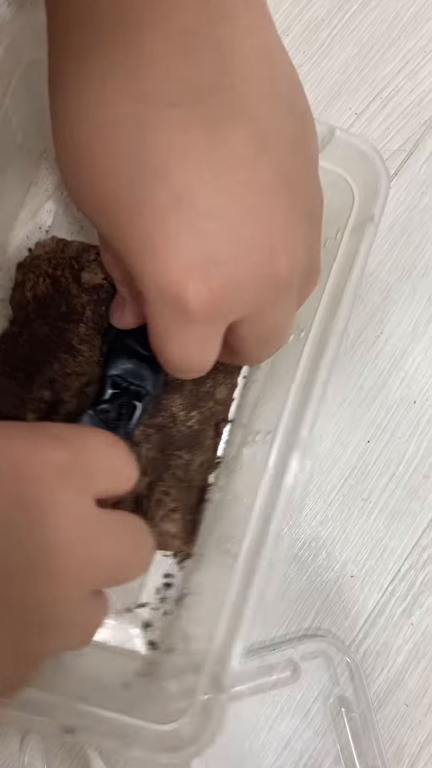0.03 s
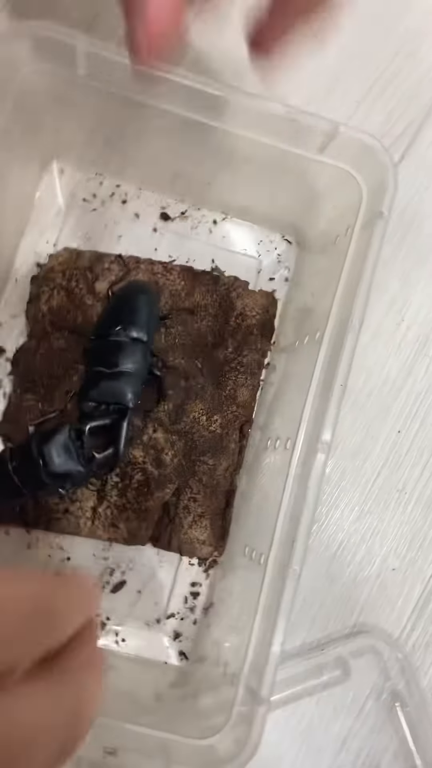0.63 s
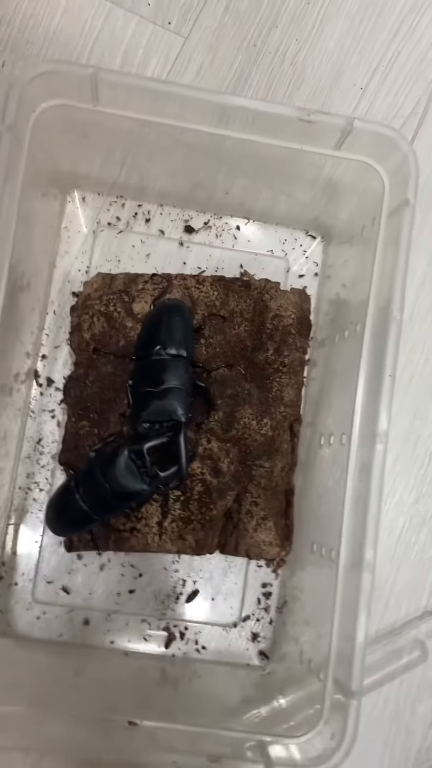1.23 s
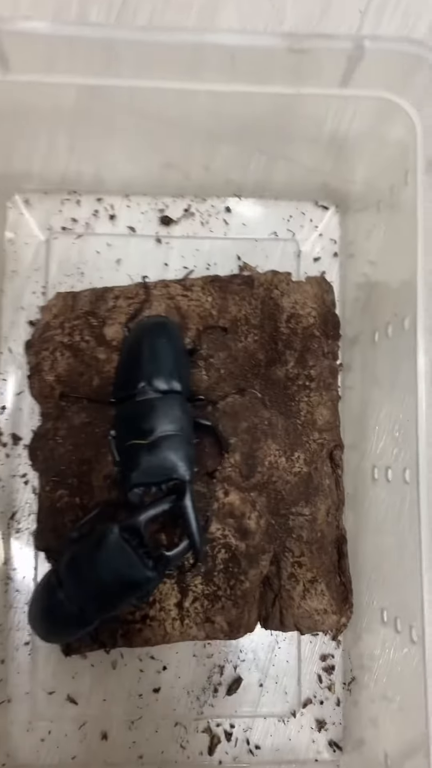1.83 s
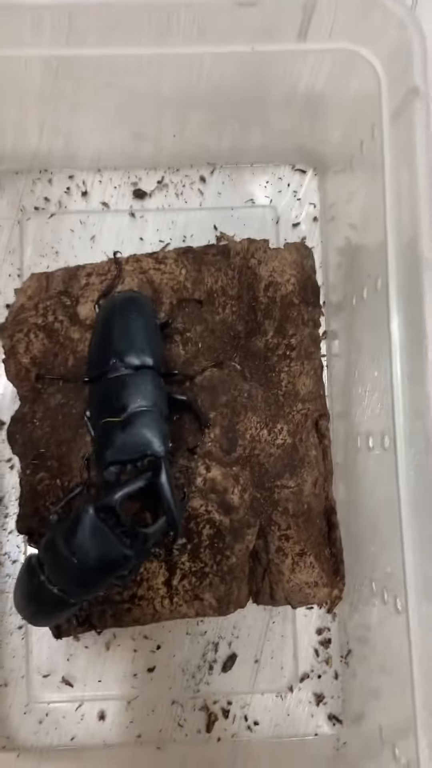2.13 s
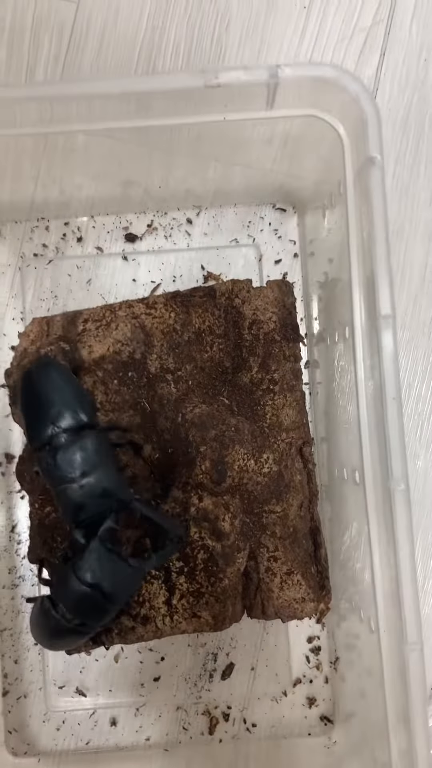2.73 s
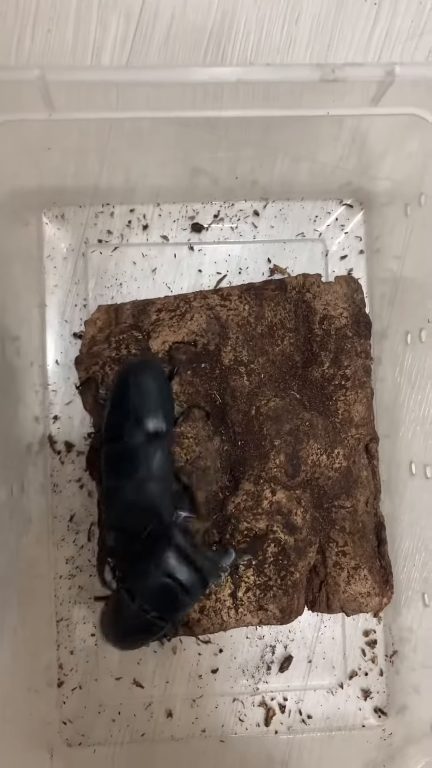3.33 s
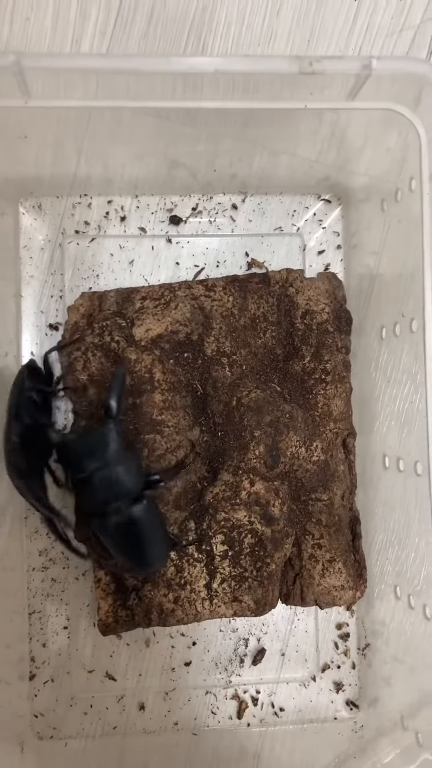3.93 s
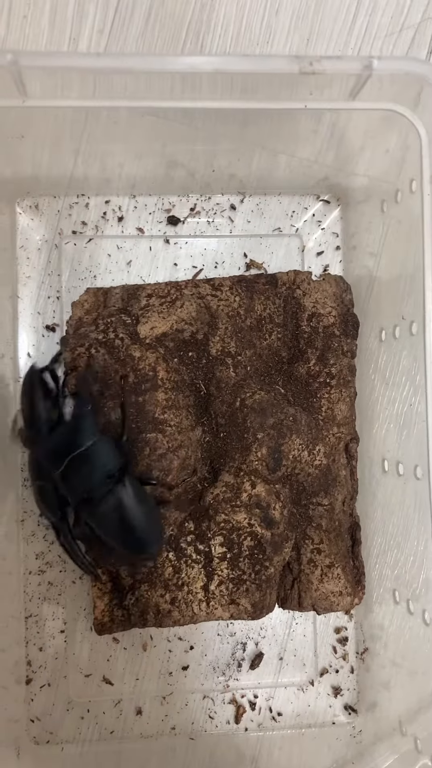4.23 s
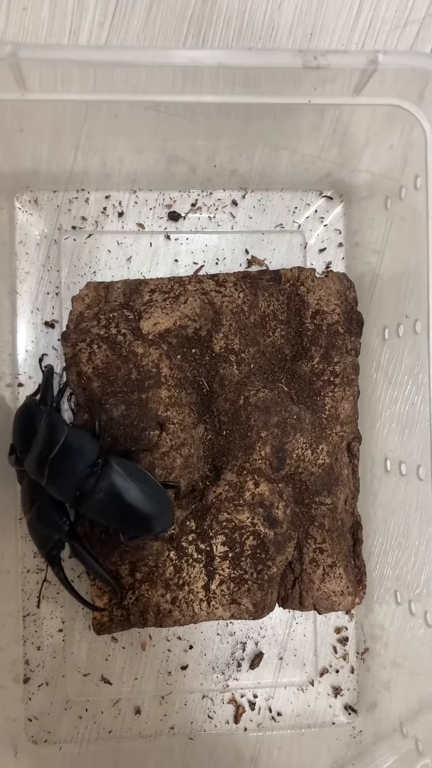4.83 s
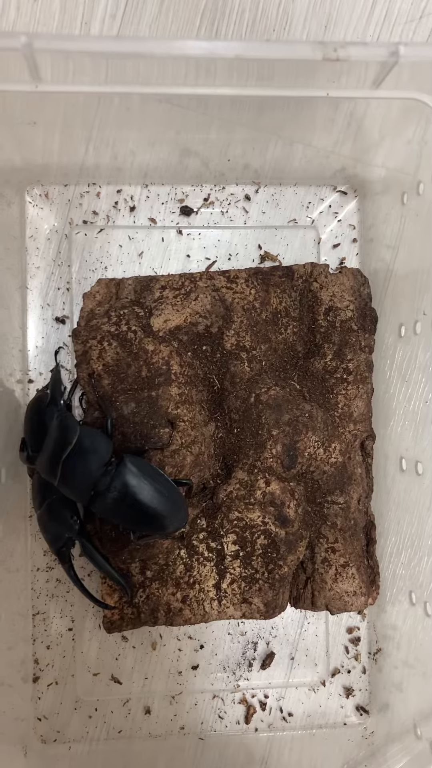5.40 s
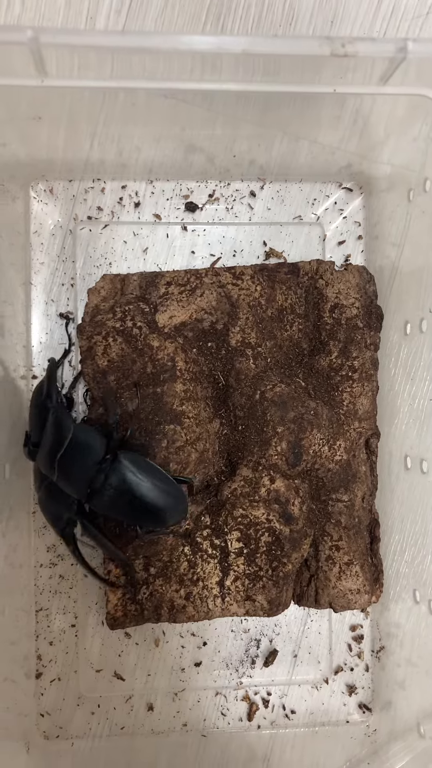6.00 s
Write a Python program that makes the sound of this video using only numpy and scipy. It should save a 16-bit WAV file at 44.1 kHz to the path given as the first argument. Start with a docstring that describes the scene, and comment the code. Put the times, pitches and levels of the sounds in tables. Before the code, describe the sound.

A steady motor hum and airy fan noise fill a small room. Close by, a soft rustle swells and sinks, and a faint hiss stops with a little pop. About halfway through, two beetles scuffle: claws scrape bark, jaws tick sharply and hard shells knock against the wall of a plastic box. The scuffle dies down, leaving a lone dry click, a faint scratch and one last tick.

```python
"""In a small room, two stag beetles wrestle on bark in a thin plastic box, close under a phone. Jaws and claws
tick, shells knock the box wall into resonance, and legs scratch and squeak by stick-slip friction. A household
motor hums throughout over fan and duct noise. Early on, fingers tap and rub as they handle the phone, a soft
rustle swells and sinks, and a thin hiss ends in a small pop; a lone faint dry click comes late."""
import sys
import numpy as np
from scipy import signal
from scipy.fft import rfft, irfft
from scipy.io import wavfile
from scipy.ndimage import uniform_filter1d

SR = 44100
rng = np.random.default_rng(int(sys.argv[2]) if len(sys.argv) > 2 else 0)


def wav_record(signal):
    """Record a signal, one row per channel, as 16-bit PCM in the file named by sys.argv[1]."""
    frames = np.transpose(np.atleast_2d(signal))
    bounded = np.clip(frames, -1, 1)
    # unit amplitude maps onto the largest positive 16-bit level
    quanta = np.round(bounded * 32767).astype(np.int16)
    wavfile.write(sys.argv[1], SR, quanta)


N = 271656
TIME = np.arange(N) / SR

# legs dragging over bark, and early on (0.364 s, 0.8 s) fingers rubbing as they handle the phone: (start [s],
# duration [s], level [dB], box vibration relative to the drag [dB])
STROKES = [(0.364, .11, -61, 4), (0.8, .17, -62.5, -1), (2.477, 0.086, -54.5, -4),
           (2.54, 0.2, -60.5, 2.5), (3.118, 0.023, -53.5, -9), (3.272, 0.038, -52.5, -6),
           (3.35, 0.078, -50.5, -6.5), (3.404, 0.087, -61.5, 8.5), (3.576, 0.011, -46, -1),
           (3.611, 0.073, -57.5, 2), (3.675, 0.1, -53.5, -3), (3.77, 0.041, -60, -11),
           (3.903, 0.025, -49.5, 4), (3.936, .06, -49.5, -9), (4.019, 0.069, -56.5, 3.5),
           (4.12, 0.068, -46, -7), (4.307, 0.03, -57, -8), (4.422, 0.025, -56, -9),
           (5.62, 0.077, -61, 1), (6.118, 0.025, -55, 0)]
# normal modes of the plastic box: (frequency [Hz], relative level [dB])
BOX_MODES = [(830, -9), (960, 1.5), (1090, -4.5), (1250, -7), (1450, -8), (1700, 1), (1910, 2),
             (2200, -1.5), (3080, -11), (3400, -11), (3920, -4.5)]


def undb(db):
    """Decibels as an amplitude ratio."""
    return 10 ** (np.asarray(db) / 20)


def unit(x):
    """Normalisation to an RMS of one."""
    return x / np.sqrt(np.mean(x ** 2))


def over_hz(rows, size):
    """Interpolation of (frequency [Hz], value) rows at the Fourier bins, on a logarithmic axis."""
    hz, value = np.transpose(rows)
    return np.interp(np.log(np.fft.rfftfreq(size, 1 / SR) + 1), np.log(hz), value)


def colour(x, rows):
    """Spectral shaping by (frequency [Hz], gain [dB]) rows."""
    return irfft(rfft(x) * undb(over_hz(rows, len(x))), len(x))


def drift(rate_hz):
    """Moving averages smooth random steps into a drift with an RMS of one."""
    hold = int(SR / rate_hz)
    steps = np.repeat(rng.standard_normal(N // hold + 1), hold)
    return unit(uniform_filter1d(uniform_filter1d(steps, hold), hold)[:N])


def add(track, start_s, x):
    """Superposition of a short sound on a track."""
    i = max(int(start_s * SR), 0)
    track[i:i + len(x)] += x[:max(N - i, 0)]


def settle(rise_db, time_constant_s=2.04):
    """Exponential approach: the gain starts rise_db low and levels off as the phone comes to rest."""
    return undb(-rise_db * np.exp(-TIME / time_constant_s))


def ring(modes, tilt_db, t60_s, pitch=1, detune=0.01, scatter_db=2.5, size=4096):
    """Free vibration is a sum of damped modes; each contact point weights and pulls them differently."""
    hz, db = np.transpose(modes)[:, :, None]
    pull, weight = rng.standard_normal((2, len(modes), 1))
    t = np.arange(size) / SR
    mode_t60_s = t60_s * np.sqrt(1000 / hz)  # higher modes are damped faster
    gain = undb(db + tilt_db * np.log2(hz / 1000) + scatter_db * weight) * rng.choice([-1, 1], hz.shape)
    decay = np.exp(-np.log(1000) * t / mode_t60_s)
    partials = gain * decay * np.sin(2 * np.pi * hz * pitch * (1 + detune * pull) * t)
    return partials.sum(0) / np.sqrt(np.sum(gain ** 2) / 2)


def room_air(flutter_db=1.43, even_above_hz=1500):
    """Fan and duct noise is partly coherent at two microphones; it flutters low down, is even above."""
    # spectrum of the air noise: (frequency [Hz], spectral level [dB])
    spectrum = [(25, -100), (60, -85), (80, -72), (100, -78.5), (130, -68.5), (200, -68), (300, -74),
                (400, -82), (485, -71.5), (550, -75.5), (700, -83.5), (1000, -82.5), (1850, -86),
                (2600, -93), (4500, -96), (5600, -104), (9000, -102), (15500, -112)]
    # likeness at the two microphones: (frequency [Hz], correlation before clipping [ratio])
    likeness = [(60, 0.89), (150, 0.99), (300, 0.8), (500, 0.37), (700, 0.0068), (1800, 0.28),
                (3000, -0.09), (5500, -0.94), (8000, 1), (10000, 0.85), (11000, -1.14), (13000, -0.84),
                (14500, 1)]
    correlation = np.clip(over_hz(likeness, N), -.995, .995)
    mid, side = (rfft(colour(rng.standard_normal(N), spectrum)) for _ in range(2))
    mid = irfft(mid * np.sqrt((1 + correlation) / 2), N)
    side = irfft(side * np.sqrt((1 - correlation) / 2), N)
    air = np.sqrt(SR / 2) * np.array([mid + side, mid - side]) * settle(rise_db=3.5)
    low = signal.sosfiltfilt(signal.butter(2, even_above_hz, fs=SR, output="sos"), air)
    return air - low + low * undb(flutter_db * drift(12))


def motor(shaft_hz=57.22, wander_hz=.012, waver_db=.1, flutter_db=0.5, diffuse_hz=600, gain_db=-33.5):
    """A turning shaft radiates harmonics; nearby tones beat against them and make the hum throb."""
    # harmonics of the shaft: (order [multiple of the shaft rate])
    orders = [1, 2, 3, 4, 5, 6, 7, 8, 9, 10, 11, 13, 15, 16, 21, 22, 23, 24]
    # strength of each harmonic: (relative level [dB])
    levels = [-24.5, -18.5, 0.5, -20, -13.5, -25, -29.5, -26, -23, -28.5, -30, -31, -38, -32, -30.5, -31.5,
              -31, -33]
    # other steady tones: (frequency [Hz], relative level [dB])
    tones = [(190.3, -10), (230.6, -17.5), (520.4, -26)]
    # harmonics weaker or stronger until the phone moves over the box: {order: level offset [dB]}
    early_offsets = {7: -8, 10: 4}
    move_s = 1.4, 1.6
    turns = np.cumsum(shaft_hz + wander_hz * drift(2.83)) / SR
    hum, sides = np.zeros((2, N)), np.array([[.5], [-.5]])
    for order, db in zip(orders, levels):
        # long waves reach both microphones nearly alike, short ones out of step
        lead_rad = .14 + np.pi / 2 / (1 + (diffuse_hz / (order * shaft_hz)) ** 4)
        early_db = np.interp(TIME, move_s, [early_offsets.get(order, 0), 0])
        amplitude = undb(db + early_db + waver_db * order * drift(12))
        hum += amplitude * np.sin(2 * np.pi * (order * turns + rng.random()) + sides * lead_rad)
    for hz, db in tones:
        amplitude = undb(db + flutter_db * drift(4.9))
        hum += amplitude * np.sin(2 * np.pi * (hz * TIME + rng.random()) + 0.27 * drift(4.07))
    return np.sqrt(2) * hum * undb(gain_db) * settle(rise_db=6.5)


def hiss(flutter_db=0.86, pop_s=2.1318, pop_db=-30.5):
    """Amplitude-modulated noise flutters, then ends in a pulse so short that it is heard as a dry pop."""
    # spectrum of the hiss: (frequency [Hz], relative level [dB])
    spectrum = [(300, -14.5), (500, 7), (650, 12), (950, -10), (1500, 1.5), (2000, -2), (2450, 4),
                (2900, -1), (4000, -2.5), (5500, -13), (9000, -64)]
    # envelope of the hiss: (time [s], level [dB])
    contour = [(0, -54), (.33, -58), (.45, -52.5), (.7, -53), (.87, -52.5), (1.1, -53.5), (2.12, -53),
               (2.15, -100)]
    noise = np.array([unit(colour(rng.standard_normal(N), spectrum)) for _ in range(2)])
    envelope = undb(np.interp(TIME, *np.transpose(contour)))
    t = TIME - pop_s
    pulse = lambda hz, width_s: np.sin(2 * np.pi * hz * t) * np.exp(-.5 * (t / width_s) ** 2)
    pop = pulse(hz=2000, width_s=0.00014) + undb(-13) * pulse(hz=800, width_s=.0004)
    return noise * envelope * undb(flutter_db * drift(70)) + 2 * undb(pop_db) * pop


def rustle(rough_db=1.5):
    """Soft, high friction noise swells and sinks, like a sleeve sliding as the phone moves in."""
    # spectrum of the rustle: (frequency [Hz], relative level [dB])
    spectrum = [(2000, 3.5), (5500, -7.5), (7500, 3), (10000, 3.5), (12000, -9), (13500, 3.5), (15600, 4.5),
                (16500, -12)]
    # swells of the rustle: (peak time [s], half width [s], level [dB])
    swells = [(.87, 0.29, -60.5), (1.245, .075, -55.5), (1.66, 0.11, -58), (2.021, 0.09, -52),
              (2.078, 0.013, -56.5)]
    envelope = sum(undb(db) * np.exp(-((TIME - s) / width_s) ** 2) for s, width_s, db in swells)
    return unit(colour(rng.standard_normal(N), spectrum)) * envelope * undb(rough_db * drift(90))


def scrapes(slips_per_s=1500, spread_db=2.5, rise_share=0.21, gain_db=2.0):
    """Stick-slip friction of claws on bark fibres makes dense tiny clicks that also excite the box."""
    # spectrum of scratched bark: (frequency [Hz], relative level [dB])
    bark = [(800, 9), (2000, -18), (4000, 3), (5600, 6.5), (7500, 3), (10000, 1.5), (12000, -5), (14500, 1),
            (16500, -39)]
    slips = (rng.random(N) < slips_per_s / SR) * rng.choice([-1, 1], N)
    slips = slips * undb(spread_db * np.minimum(rng.exponential(size=N), 4))
    drag, shake = np.zeros(N), np.zeros(N)
    for s, length_s, db, box_db in STROKES:
        triangle = np.interp(TIME, [s, s + length_s * rise_share, s + length_s], [0, 1, 0])
        stroke = undb(db + gain_db) * triangle ** 0.75
        drag += stroke
        shake += stroke * undb(box_db)
    box = unit(signal.fftconvolve(slips, ring(BOX_MODES, tilt_db=3, t60_s=0.056))[:N])
    return drag * unit(colour(slips, bark)) + shake * box


def squeaks():
    """Friction-induced oscillation: a claw chatters on a smooth shell in a brief, rough tone."""
    # slipping claws: (time [s], frequency [Hz], width [s], level [dB], frequency spread [ratio])
    slips = [(.087, 7730, 0.0024, -45.5, 0.045), (.087, 3340, 0.0034, -48, 0.027),
             (.110, 7700, 0.002, -51, .04), (.110, 3290, 0.0034, -46, .03),
             (.348, 6620, 0.0014, -47.5, 0.045), (2.492, 2600, 0.011, -47.5, .13),
             (2.496, 6200, 0.012, -50, 0.07), (3.712, 6800, .002, -42.5, .05),
             (3.766, 5640, 0.0012, -31, 0.047)]
    out = np.zeros(N)
    t = np.arange(-2048, 2048) / SR
    for s, hz, width_s, db, spread in slips:
        waver = unit(uniform_filter1d(rng.standard_normal(len(t)), size=16))
        phase = 2 * np.pi * np.cumsum(hz * (1 + spread * waver)) / SR
        add(out, s + t[0], undb(db) * np.exp(-.5 * (t / width_s) ** 2) * np.sin(phase))
    return out


def knocks(gain_db=-2, radiate_hz=750, crack_db=-7, crack_s=0.00097, crack_hz=3400):
    """Impact excitation: a shell cracks on the plastic and rings it; a small wall radiates little bass."""
    # shell impacts, the first (0.218 s) a finger tap: (time [s], level [dB], tilt [dB/octave], mode tuning
    # [ratio], T60 at 1 kHz [s])
    impacts = [(0.218, -39.5, 2, 1.2, 0.031), (3.412, -40.5, 1, 1.1, 0.041), (3.5814, -38, -2, 0.97, 0.036),
               (3.7712, -34.5, 4, 0.96, .025), (3.839, -35.5, 3, .9, 0.051),
               (3.9069, -30.5, 11, 1.02, 0.039), (3.9095, -29, -3.5, 1.08, 0.048),
               (3.9145, -35, 5, 1, 0.045), (3.931, -32, -2, 1, 0.05), (3.946, -41, -1, 1.2, 0.043),
               (3.978, -32.5, 3.5, .98, 0.05), (4.1477, -24.5, 0, 0.96, 0.032),
               (4.2125, -34.5, 2, 0.97, 0.047), (4.268, -33.5, -17, 1.03, 0.045),
               (4.408, -40.5, -15, 0.82, .05)]
    out = np.zeros(N)
    band = signal.butter(2, [crack_hz / 1.4, crack_hz * 1.4], "band", fs=SR, output="sos")
    for s, db, tilt_db, pitch, t60_s in impacts:
        box = ring(BOX_MODES, tilt_db, t60_s, pitch)
        t = np.arange(len(box)) / SR
        crack = unit(signal.sosfilt(band, rng.standard_normal(len(t)))) * np.exp(-t / crack_s)
        add(out, s, undb(db + gain_db) * (box + undb(crack_db + tilt_db) * crack))
    return signal.sosfilt(signal.butter(2, radiate_hz, "high", fs=SR, output="sos"), out)


def catches(per_s=44, offset_db=-1, slip_s=0.00015, most=8):
    """A random point process: dragging claws and fingers catch, giving rows of (time, level, tilt, slip time)."""
    rows = []
    for s, length_s, db, _ in STROKES:
        positions = rng.random((2, most)).mean(0)  # catches cluster in mid-stroke
        caught = np.arange(most) + rng.random() < per_s * length_s
        rows += [(s + length_s * position, db + offset_db, 0, slip_s) for position in positions[caught]]
    return rows


def tick(db, tilt_db, slip_s, chatter_db=-7, echo_s=0.0019, echo_db=-14, gain_db=3, size=1024):
    """Impulse response, as of a claw or jaw: a chattering crack, a brief ring, an echo off the wall."""
    # normal modes of a chitin jaw or claw: (frequency [Hz], relative level [dB])
    chitin_modes = [(2300, -11), (3800, -14), (4750, 1), (6400, -3), (7200, -1), (8300, -0.5), (9600, -1),
                    (10300, -3), (14000, -2.5), (15200, -5.5)]
    # spectrum of the first hard contact: (frequency [Hz], relative level [dB])
    crack_spectrum = [(1500, -18), (4700, 9.5), (10000, -5.5), (12000, -15), (14500, 0.5)]
    t = np.arange(size) / SR
    chatter = undb(chatter_db) * rng.standard_normal(size) * np.exp(-t / slip_s)
    force = signal.unit_impulse(size) + chatter
    tilted = [(hz, level + tilt_db * np.log2(hz / 1000)) for hz, level in crack_spectrum]
    crack = irfft(undb(over_hz(tilted, size)))
    chitin = ring(chitin_modes, tilt_db, t60_s=0.009, detune=0.017, scatter_db=3.0, size=size)
    response = unit(chitin) + unit(crack)
    snap = np.roll(irfft(rfft(force) * rfft(response)), size // 2)  # onset in mid-array
    snap = snap + undb(echo_db) * np.roll(snap, int(echo_s * SR))
    rms = np.sqrt(np.sum(snap ** 2) / (SR * 0.0014))  # as if all its energy fell within 1.4 ms
    return snap * undb(db + gain_db) / rms


def ticks():
    """Impulsive transients: sharp ticks of jaws and claws, an early finger tap, and one lone faint dry click
    near 5.39 s."""
    # sharp ticks, the first (0.218 s) a finger tap, and the lone click: (time [s], level [dB], tilt
    # [dB/octave], chatter decay time [s])
    transients = [(0.218, -51.5, -6, 0.00065), (2.980, -51.5, -6, .0002), (3.149, -44, 3, .0005),
                  (3.1723, -37.5, 5, 0.00017), (3.180, -51, 0, .0003), (3.233, -48, 20, .0004),
                  (3.284, -46, 20, .0008), (3.3534, -37, 18, .0002), (3.356, -40, 14, .00088),
                  (3.362, -39.5, 16, .0012), (3.5732, -35, 1, 0.00032), (3.576, -39.5, -4, 0.00018),
                  (3.605, -43, 6, .0006), (3.632, -53, -3, .0005), (3.766, -42, -3, .001),
                  (3.7812, -45, 3, .0004), (3.7915, -48, 3, .0004), (3.8264, -35.5, -3.5, .0003),
                  (3.8388, -32, 2, 0.00056), (3.9037, -36, 11, 0.00075), (3.907, -37.5, 2, .00068),
                  (3.945, -37, 4, 0.00034), (3.978, -41.5, -3, .0006), (3.9867, -39.5, 7, .0004),
                  (4.028, -46, 4, .0005), (4.038, -37, 14, .00036), (4.0462, -51, 12, .0004),
                  (4.1288, -35, -5, 0.0025), (4.148, -39.5, 10, 0.00082), (4.2661, -35, -3, 0.00064),
                  (4.326, -42, -6, .0015), (4.5417, -39.5, 5.5, 0.00027), (5.3864, -47, -10, 0.00011),
                  (6.120, -38, 8, .0004)]
    out = np.zeros(N)
    for s, db, tilt_db, slip_s in transients + catches():
        snap = tick(db, tilt_db, slip_s)
        add(out, s - len(snap) / 2 / SR, snap)
    return out


def at_phone(x, wet_db=-15, t60_s=0.11, size=12000):
    """Propagation: sound reaches the left microphone first, and the room adds faint reverberation."""
    # lead of the left microphone: (frequency [Hz], phase [rad])
    phase_lead = [(100, 1), (700, 0.74), (2400, 1.94), (4100, 2.47), (5400, 3.24), (7500, 5), (9500, 7.44),
                  (11800, 8.76), (16500, 16)]
    lead_rad = over_hz(phase_lead, N)
    direct = np.array([irfft(rfft(x) * np.exp(1j * sign * lead_rad / 2), N) for sign in (1, -1)])
    tail = rng.standard_normal((2, size)) * np.exp(-np.log(1000) * np.arange(size) / SR / t60_s)
    tail /= np.sqrt(np.sum(tail ** 2) / 2)
    return direct + undb(wet_db) * signal.fftconvolve(x[None], tail, axes=1)[:, :N]


def scene():
    """Superposition of the hum of the room and the beetles in their box."""
    room = motor() + room_air() + hiss()
    return room + at_phone(rustle() + scrapes() + squeaks() + knocks() + ticks())


def record(dry):
    """Gating and band limiting: the phone opens its input and cuts the highest treble."""
    open_s, fade_s, cutoff_hz = .035, 0.0022, 16300
    gate = np.clip((TIME - open_s) / fade_s, 0, 1)
    return signal.sosfilt(signal.ellip(8, .2, 70, cutoff_hz, fs=SR, output="sos"), dry * gate)


dry = scene()
out = record(dry)
wav_record(out)
```